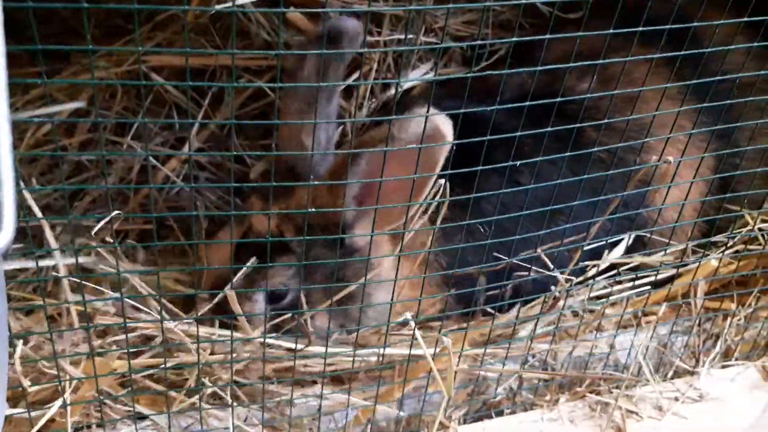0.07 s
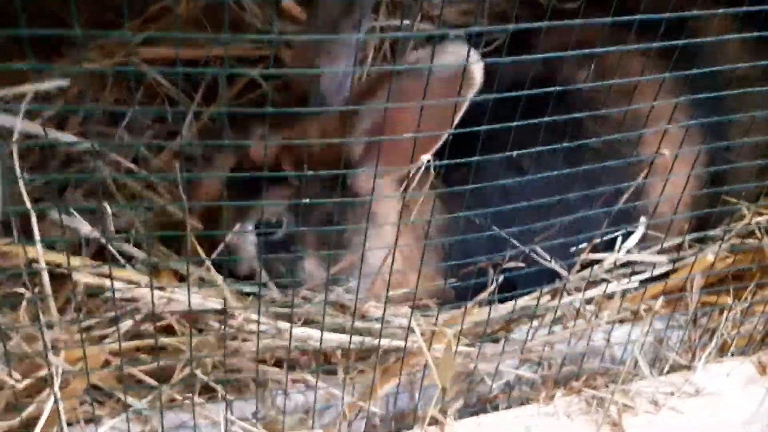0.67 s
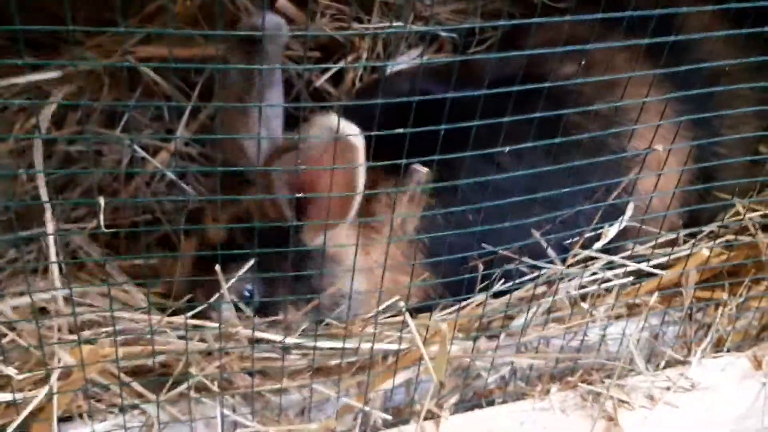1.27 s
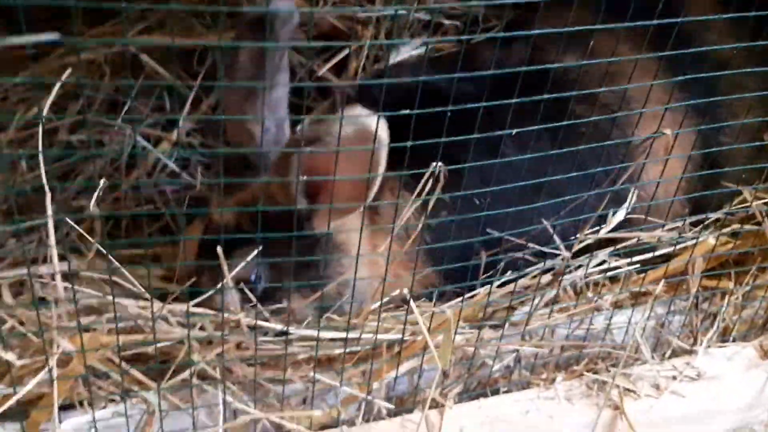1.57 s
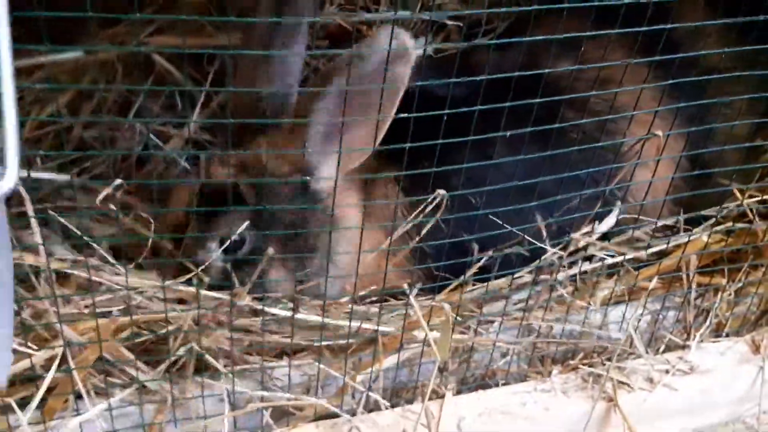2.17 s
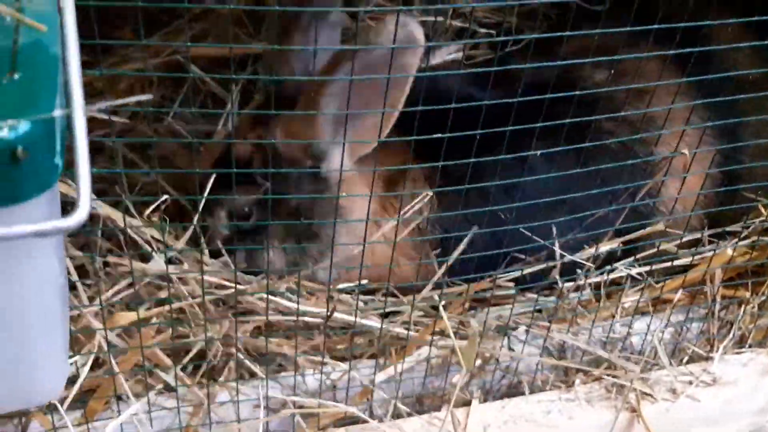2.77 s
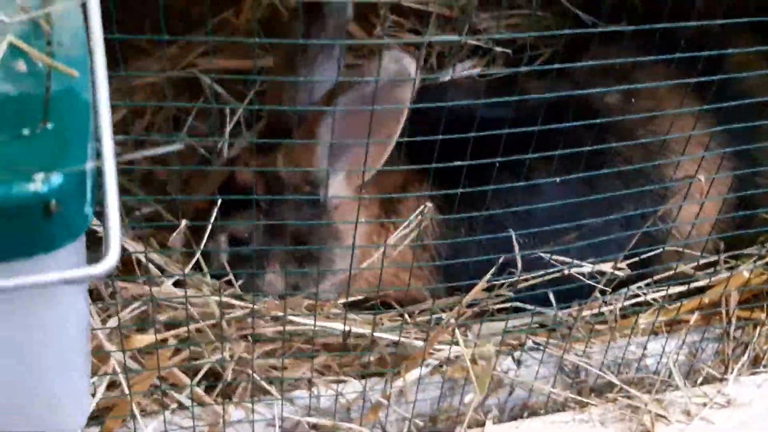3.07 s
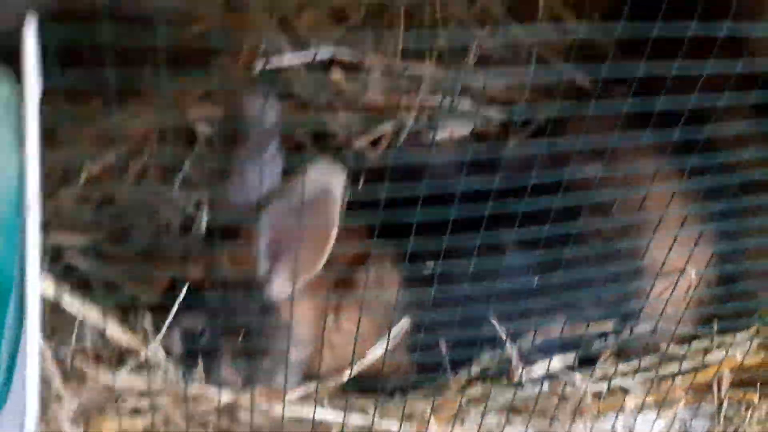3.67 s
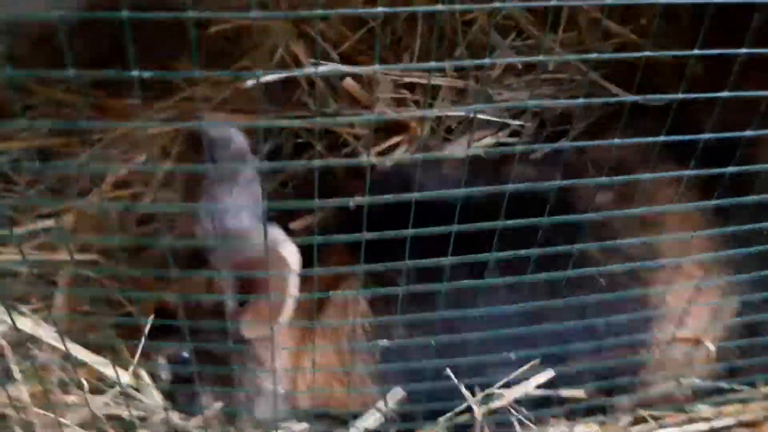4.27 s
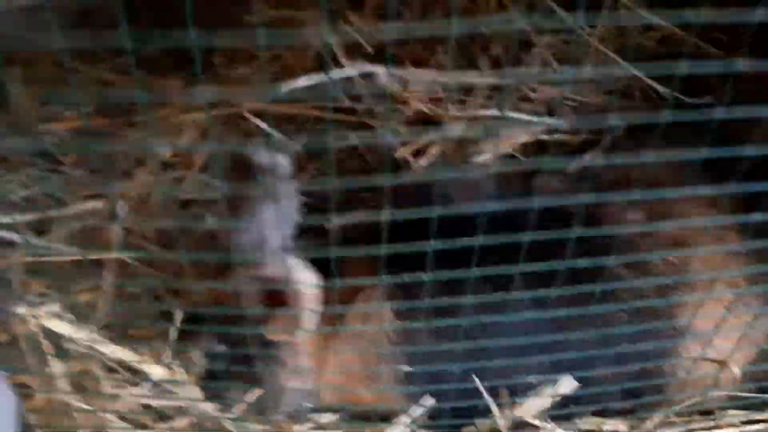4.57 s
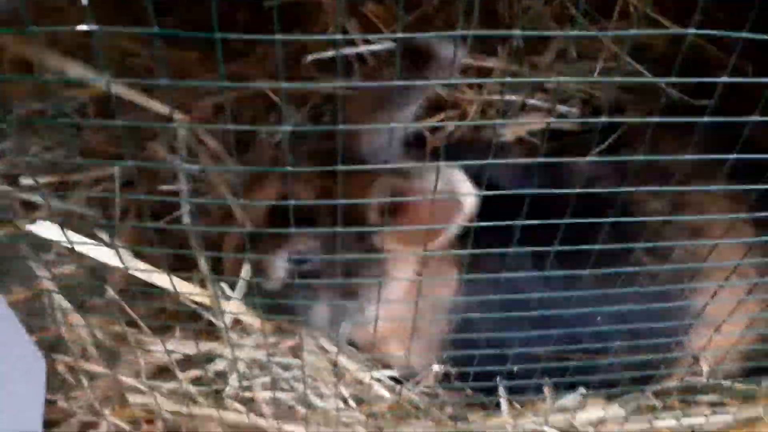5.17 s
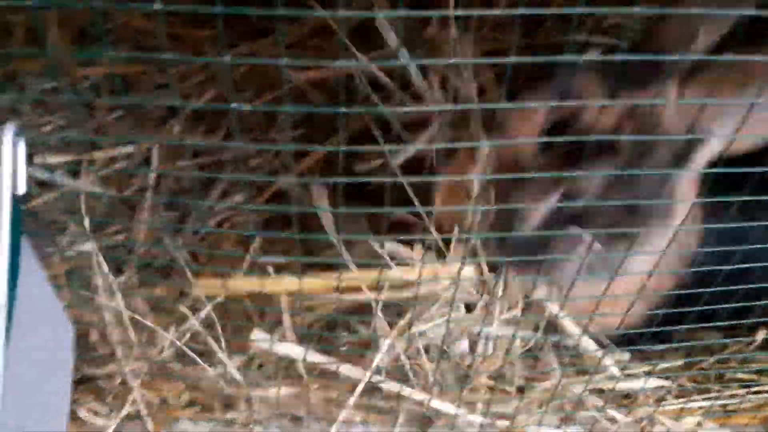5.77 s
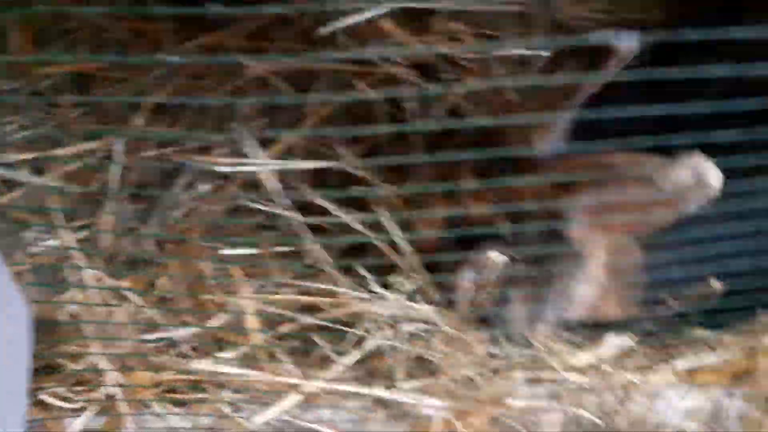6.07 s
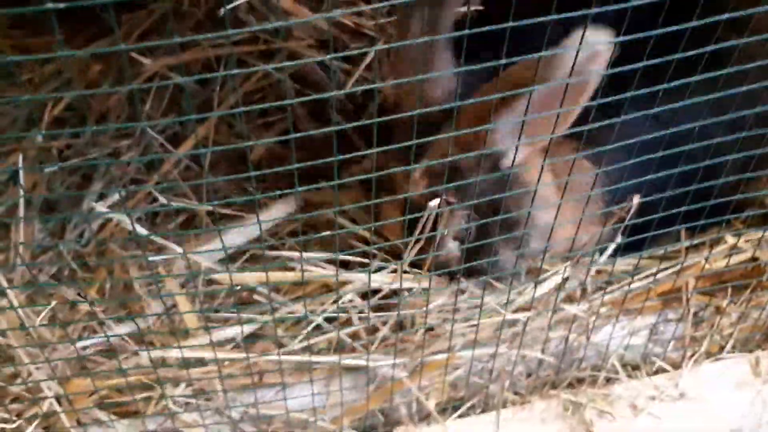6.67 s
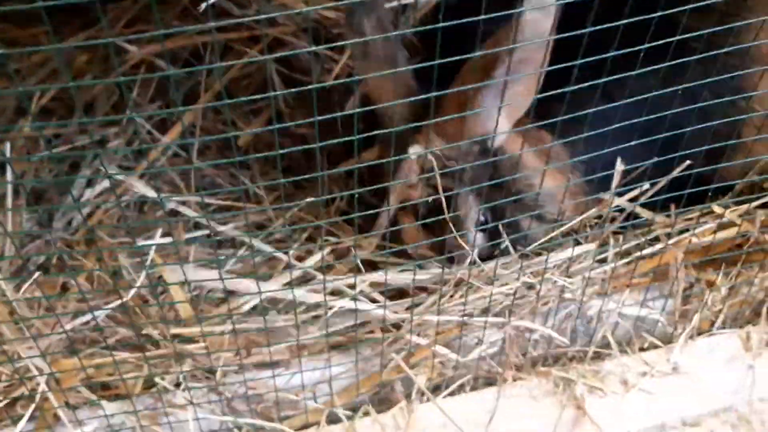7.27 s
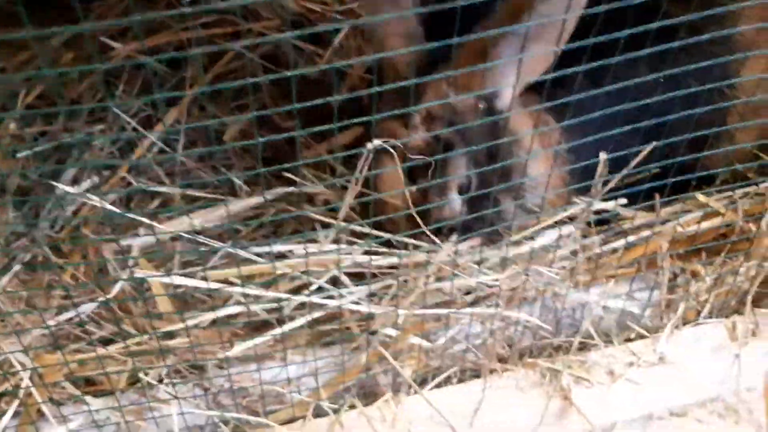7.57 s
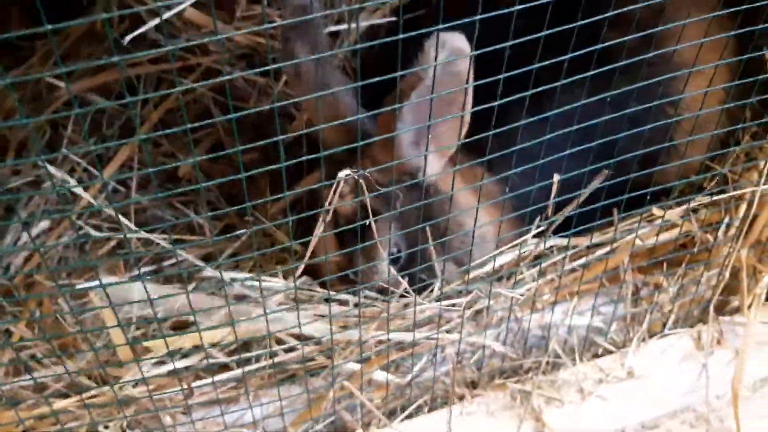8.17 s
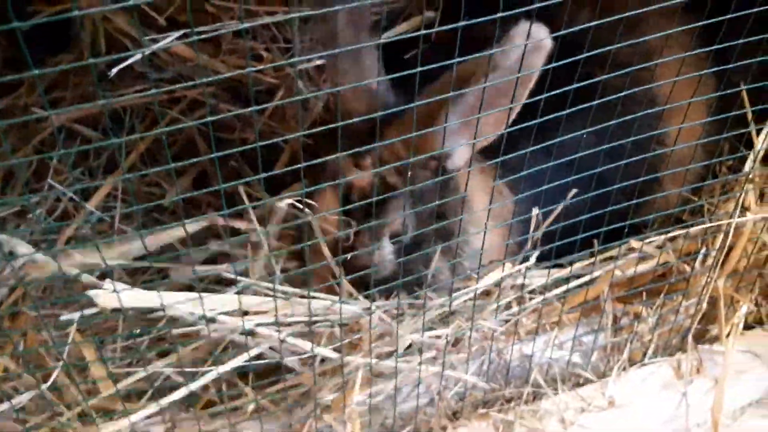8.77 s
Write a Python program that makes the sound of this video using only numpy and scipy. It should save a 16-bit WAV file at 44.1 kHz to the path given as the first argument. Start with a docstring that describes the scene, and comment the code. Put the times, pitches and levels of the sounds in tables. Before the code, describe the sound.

Close, crisp rustling of straw swells and relaxes as a rabbit pushes and tugs at its bedding in an outdoor hutch. Stalks snap here and there, and a rubbed board gives brief, faint hollow notes. Low wind buffets the microphone around the middle, then a claw or tooth knocks the wood several times. The brightest crackle comes at the end.

```python
"""Rabbit in a straw-filled hutch

A rabbit noses and tugs through dry straw, close to a stereo microphone. With each shove countless
stalks crackle, thicker stems crunch and the bedding scrapes over the floor boards; single stalks snap.
Now and then it rubs a hollow note from a board or knocks the wood with a claw or tooth.
Light puffs of air rumble in one microphone port or the other, over a quiet outdoor background."""
import sys
import numpy as np
from scipy import signal
from scipy.io import wavfile
from scipy.ndimage import uniform_filter1d

SR = 44100
rng = np.random.default_rng(int(sys.argv[2]) if len(sys.argv) > 2 else 0)


def pcm_store(signal):
    """Save signal as 16-bit PCM."""
    levels = np.round(np.clip(np.atleast_2d(signal), -1, 1) * 32767)
    wavfile.write(sys.argv[1], SR, levels.astype(np.int16).T)


N = 393813


def gain_of(db):
    """Decibels to gain."""
    return 10 ** (np.asarray(db) / 20)


def unit_rms(x):
    """Scales to rms 1."""
    return x / np.sqrt(np.mean(x ** 2) + 1e-20)


def pan(db):
    """Left and right gains for a level difference; positive leans left."""
    return gain_of(np.array([[db], [-db]]) / 2)


def fader(points):
    """A curve of (time_s, level_db) points as a gain for every sample."""
    times, db = np.transpose(points)
    return gain_of(np.interp(np.arange(N) / SR, times, db))


def add(mix, start_s, sound):
    """Mixes a stereo sound in at start_s."""
    part = mix[:, max(round(start_s * SR), 0):][:, :sound.shape[1]]
    part += sound[:, :part.shape[1]]


def colour(x, points, size=4096):
    """Minimum-phase EQ through (pitch_hz, gain_db) points."""
    hz, db = np.transpose(points)
    log_hz = np.log(abs(np.fft.fftfreq(size, 1 / SR)) + 1)
    log_gain = np.log(gain_of(np.interp(log_hz, np.log(hz), db)))
    response = np.exp(np.conj(signal.hilbert(log_gain)))
    taps = np.fft.ifft(response).real[:size // 2]
    return signal.oaconvolve(x, taps[None], axes=1)[:, :x.shape[1]]


def ring(x, hz, width_hz):
    """One resonance of gain 1."""
    return signal.lfilter(*signal.iirpeak(min(hz, SR * .45), hz / width_hz, fs=SR), x)


def wood_ring(x, modes):
    """A wooden part ringing in its modes."""
    return sum(gain_of(db) * ring(x, hz, width_hz) for hz, width_hz, db in modes)


def stereo_noise(size, alike):
    """White noise whose two channels have the correlation `alike`."""
    left, other = rng.standard_normal((2, size))
    return np.array([left, alike * left + np.sqrt(1 - alike ** 2) * other])


def hutch(x, wet_db, t60_s, size=8192):
    """Direct sound plus the dense, short echoes of the box, different at each microphone."""
    t = np.arange(size) / SR
    tail = rng.standard_normal((2, size)) * gain_of(-60 * t / t60_s) * (1 - np.exp(-t / 0.0014))
    tail *= gain_of(wet_db) / np.linalg.norm(tail[0])
    return x + signal.oaconvolve(x, tail, axes=1)[:, :x.shape[1]]


def burst(decay_s, alike, size=4096):
    """Stereo noise that starts at once and dies away."""
    return stereo_noise(size, alike) * np.exp(-np.arange(size) / SR / decay_s)


def grains(per_s, spread_db, decay_s, echo, t60_s, alike, lag_s, size=4096):
    """Fibres break at random, mostly small, a few large: noise bursts trailed by the box's echoes."""
    chance, strength = rng.random((2, N))
    sizes = gain_of(spread_db * np.minimum(-np.log(1 - strength), 5))
    energy = (chance < per_s / SR) * sizes ** 2
    t = np.arange(size) / SR
    energy_fades = np.exp(-t / decay_s) ** 2, gain_of(-60 * t / t60_s) ** 2
    hits, tails = (np.sqrt(abs(signal.oaconvolve(energy, fade / fade.sum())[:N]))
                   for fade in energy_fades)
    left, right = stereo_noise(N, alike) * hits
    direct = np.array([left, np.roll(right, int(lag_s * SR))])  # the left microphone is nearer
    return direct + echo * tails * rng.standard_normal((2, N))


def drift(x, depth_db, span_hz, span_s):
    """Different stalks come into play, so the colour drifts in patches."""
    spectrum = signal.stft(x, nperseg=512)[2]
    patches = rng.standard_normal(spectrum.shape[1:])
    for axis, steps in enumerate((span_hz * 512 / SR, span_s * SR / 256)):
        for _ in range(2):
            patches = uniform_filter1d(patches, max(int(steps), 1), axis)
    return signal.istft(spectrum * gain_of(depth_db * unit_rms(patches)), nperseg=512)[1][:, :N]


def pushing():
    """Each shove swells and relaxes; returns the envelopes that drive crackle, crunch and boards."""
    # shoves and tugs: peak_s, rise_s, fall_s, crackle_db, crunch_db, boards_db (last two re crackle)
    shoves = [(.13, 0.18, 0.24, -48.5, -9, -17), (.26, 0.072, 0.049, -50, -9.5, -14),
              (.52, 0.092, .07, -45, -10, -19), (.595, 0.067, 0.079, -46.5, -6, -17),
              (0.9, 0.051, 0.076, -48, -7.5, -14), (1.178, 0.063, .022, -50.5, -11.5, -31),
              (1.226, 0.018, .02, -48, -5, -17), (1.289, 0.044, .079, -51, -7, -15.5),
              (1.435, 0.064, 0.07, -57, -4, -9), (1.644, 0.084, 0.07, -56, -5, -7.5),
              (1.789, 0.19, 0.017, -51, -14.5, -15), (1.948, .12, 0.045, -48, -7, -14),
              (2.239, 0.12, 0.035, -51, -7.5, -15), (2.309, 0.023, .1, -48, -6, -10.5),
              (2.443, 0.16, 0.022, -55, -8.5, -10.5), (2.656, .096, 0.053, -48, -7.5, -11.5),
              (2.734, .075, 0.17, -50, -9.5, -13.5), (2.899, .014, 0.092, -51, -4, -10),
              (3.203, .11, 0.04, -43.5, -9.5, -21), (3.358, 0.12, .038, -50.5, -8, -10),
              (3.418, 0.024, .09, -54.5, -1.5, -1.5), (3.69, 0.12, 0.11, -56, 0, -2.5),
              (3.82, 0.058, 0.043, -46, -7.5, -16.5), (3.93, 0.088, 0.2, -50, -7, -16.5),
              (4.207, 0.024, 0.11, -48.5, -13.5, -32), (4.376, 0.29, .067, -55.5, -3, -12.5),
              (4.513, .088, 0.36, -53.5, -4, -8.5), (4.775, 0.067, 0.091, -40, -7, -13.5),
              (4.835, 0.053, 0.043, -47, -5.5, -6), (4.98, 0.12, 0.1, -62, -7, -5.5),
              (5.3, .059, .11, -40.5, -9, -16.5), (5.397, 0.034, .221, -43.5, -6, -10),
              (5.609, 0.039, 0.064, -49, -2.5, -5.5), (5.806, 0.11, 0.15, -41, -9.5, -11.5),
              (5.914, .063, 0.038, -47, -0.5, -10), (5.99, 0.041, 0.085, -39, -7.5, -10),
              (6.446, .15, .101, -50.5, -11, -20), (6.637, .14, 0.079, -43, -8, -18.5),
              (6.729, 0.051, 0.091, -46.5, -9, -12.5), (7, 0.12, 0.086, -44, -10.5, -16),
              (7.075, .03, 0.048, -50.5, -6, -7), (7.275, 0.064, 0.07, -49, -7, -11.5),
              (7.462, 0.095, 0.018, -48.5, -6.5, -13), (7.496, 0.032, 0.053, -49, 0.5, 2.5),
              (7.742, 0.11, .15, -53.5, -9.5, -21), (7.843, .075, 0.062, -51, -17, -14),
              (8.226, 0.18, 0.04, -51.5, -10, -19), (8.284, .019, 0.037, -43, -6.5, -16),
              (8.442, 0.057, .1, -47, -6.5, -13), (8.66, 0.081, 0.15, -48, -10, -16.5),
              (8.911, 0.059, .069, -34.5, -8.5, -20.5)]
    swell_shape = 1.3  # 1 pointed, 2 rounded
    settling_db = -71.5 + np.array([[0], [-9.5], [-19]])  # the straw never lies quite still
    t = np.arange(0, N / SR, .002)
    power = gain_of(settling_db) ** 2
    for peak_s, rise_s, fall_s, db, crunch_db, boards_db in shoves:
        swell = np.exp(-abs((t - peak_s) / np.where(t < peak_s, rise_s, fall_s)) ** swell_shape)
        gains = gain_of(db + np.array([[0], [crunch_db], [boards_db]]))
        power = power + (gains * swell) ** 2
    return [np.interp(np.arange(N) / SR, t, np.sqrt(layer)) for layer in power]


def crackle(drive):
    """Thin dry stalks slip over each other in a bright spray of ticks."""
    # crisp top end of dry straw: pitch_hz, gain_db
    straw_eq = [(1800, -33), (3300, -8.5), (5000, 0), (6300, 1.7), (7800, 4), (8600, -3.5), (9500, -2),
                (11800, 4.5), (13500, 3.5), (15800, 2.5)]
    ticks = grains(per_s=2200, spread_db=3.4, decay_s=.0005, echo=.8, t60_s=.07, alike=.4, lag_s=.00005)
    ticks = drift(ticks, depth_db=1, span_hz=1186, span_s=.025)
    return gain_of(2.4) * pan(-0.12) * drive * unit_rms(colour(ticks, straw_eq))


def crunch(drive):
    """Thicker stems bend deeper in the bedding; the brittle ones splinter and sound brighter."""
    # midrange of bending stems: pitch_hz, gain_db
    bend_eq = [(450, -19), (750, -4.5), (920, -1), (1150, -2.5), (1400, -1.5), (1800, 0), (2250, 0.5),
               (2800, -7), (3600, -14), (6000, -21)]
    # bite of splitting stems: pitch_hz, gain_db
    splinter_eq = [(1200, -24.5), (2200, -7), (2900, -3), (4000, -4), (5500, -10), (9000, -14.5)]
    # how much the pressed stems splinter: time_s, gain_db
    brittleness = [(0, 2.5), (1.6, 0.5), (3.2, 0), (3.9, -2), (6, -1.5), (6.3, -6), (7.15, -4.5), (8, -20),
                   (8.3, -0.5), (8.93, -1.5)]
    bends = grains(per_s=1500, spread_db=2.5, decay_s=.0011, echo=.96, t60_s=.079,
                   alike=.52, lag_s=.00039)
    bends = drift(bends, depth_db=2.5, span_hz=350, span_s=.05)
    splinters = grains(per_s=700, spread_db=3.5, decay_s=.00039, echo=1, t60_s=.13,
                       alike=.34, lag_s=.00007)
    splinters = drift(splinters, depth_db=1, span_hz=700, span_s=.028)
    bending = gain_of(-1.26) * pan(4.7) * unit_rms(colour(bends, bend_eq))
    splitting = gain_of(-1) * pan(0.74) * fader(brittleness) * unit_rms(colour(splinters, splinter_eq))
    return drive * (bending + splitting)


def boards(drive):
    """The dragged bedding sets the floor boards ringing."""
    # modes of the floor boards: pitch_hz, width_hz, gain_db
    floor_modes = [(293, 46, -4.5), (347, 55, 0), (419, 25, 3), (486, 54, 4), (583, 64, -3), (750, 81, -23)]
    scrape = grains(per_s=1200, spread_db=1, decay_s=.00072, echo=.55, t60_s=.17,
                    alike=.85, lag_s=.00008)
    wood = wood_ring(scrape, floor_modes)
    wood = colour(wood, [(100, -25.5), (260, -2.5), (750, -4), (1500, 0), (4000, -45)])
    return gain_of(-0.07) * pan(0.29) * drive * unit_rms(wood)


def outdoor_air():
    """A quiet, steady bed of outdoor noise."""
    # low murmur with a faint hiss: pitch_hz, gain_db
    air_eq = [(20, -29), (70, 5), (150, -0.5), (300, -6), (550, -9), (900, -16.5), (1900, -16), (3300, -34),
              (7000, -12), (9000, -20), (15000, -17)]
    return gain_of(-66) * unit_rms(colour(stereo_noise(N, alike=0.75), air_eq))


def ports(pan_db):
    """Constant-power gains for air striking one port more than the other; positive leans left."""
    return 1 / np.sqrt(1 + gain_of(2 * np.array([[-pan_db], [pan_db]])))


def buffeting():
    """Turbulence rumbles in each port separately, swelling with every puff; single eddies thump softly."""
    # deep wind rumble: pitch_hz, gain_db
    rumble_eq = [(20, -49), (35, -26), (50, -2), (80, -0.5), (110, -7.5), (160, -13.5), (250, -21),
                 (400, -35), (900, -54)]
    # puffs passing the ports: peak_s, half_length_s, level_db, pan_db
    puffs = [(0.405, .025, -57, 7), (0.889, 0.041, -52, -24), (1.18, 0.065, -53, -27),
             (1.503, 0.14, -56, -13), (1.76, 0.16, -56, -16), (1.964, 0.049, -60, 2),
             (2.41, 0.13, -59.5, -12), (2.764, 0.074, -56.5, -3), (3.106, 0.093, -46, -12),
             (3.645, 0.067, -43, -32), (3.823, 0.084, -47.5, -16), (3.941, 0.063, -35.5, -25),
             (4.07, 0.093, -46.5, -7), (4.277, 0.072, -44, -3), (4.51, 0.15, -49.5, -3),
             (4.69, 0.1, -44, 2.5), (4.86, 0.043, -51.5, -20), (5.034, 0.089, -56, -5),
             (5.17, 0.0083, -51, -25), (5.376, 0.048, -55, -12), (5.576, 0.055, -56.5, -5),
             (5.86, 0.13, -62, 2), (6.287, 0.046, -52.5, -28), (7.524, 0.057, -59, 2), (7.78, .06, -68, 0),
             (8.302, .03, -65, 7), (8.92, .07, -57.5, 3)]
    # faint draught between puffs, dying down late on: time_s, level_db
    draught = [(0, -67), (.75, -68), (2.1, -72), (3.3, -62), (5.3, -62.5), (6.4, -83), (8.93, -78)]
    # eddies hitting a port: peak_s, level_db, pitch_hz, half_length_s, pan_db
    eddies = [(1.191, -39, 68.5, 0.01, -26), (1.463, -40, 85.5, 0.0068, -22), (1.533, -40, 80, 0.0088, -15),
              (3.094, -28, 85, 0.0087, -30), (3.601, -34, 85, 0.013, -27), (3.662, -32, 80, 0.0071, -34),
              (3.701, -33.5, 101, 0.0081, -28), (3.911, -28.5, 75, 0.0091, -29),
              (3.948, -32.5, 86, 0.013, -30), (3.969, -26, 85, .01, -28), (4.259, -28, 74, 0.011, 10),
              (4.48, -37, 70, 0.015, -17), (4.562, -23, 86, 0.0047, 24), (4.725, -27.5, 73.5, 0.013, 20),
              (6.277, -47, 109, 0.028, -26)]
    rumble = unit_rms(colour(rng.standard_normal((2, N)), rumble_eq, size=16384))
    t = np.arange(0, N / SR, .002)
    power = sum((gain_of(db) * ports(pan_db) * np.exp(-((t - peak_s) / half_s) ** 2)) ** 2
                for peak_s, half_s, db, pan_db in puffs)
    swells = np.array([np.interp(np.arange(N) / SR, t, np.sqrt(side)) for side in power])
    out = gain_of(2.7) * np.hypot(swells, ports(pan_db=-7) * fader(draught)) * rumble
    for peak_s, db, hz, half_s, pan_db in eddies:
        t = np.arange(-3 * half_s, 3 * half_s, 1 / SR)
        phase = rng.normal(0, 0.59, (2, 1))
        thump = np.exp(-(t / half_s) ** 2) * np.cos(2 * np.pi * hz * t + phase)
        add(out, peak_s + t[0], gain_of(db) * ports(pan_db) * thump)
    return out


def snaps():
    """A stalk breaks in under a millisecond, its last fibres tear, it rings and the hutch answers."""
    # single stalks breaking: start_s, level_db, pitch_hz, pan_db
    breaks = [(0.269, -35, 7900, -11), (0.961, -43.5, 15000, 5), (1.1763, -38, 14600, 3),
              (1.2189, -39, 14600, -2), (1.235, -43, 14400, -5), (1.3835, -40, 14900, 1),
              (1.4207, -41.5, 6700, 4), (1.787, -44, 14400, -6), (1.8814, -40, 13400, -1),
              (2.177, -38.5, 6300, 2), (2.2854, -40.5, 4500, 1), (2.2973, -36, 14400, 4),
              (2.598, -40, 11800, 4), (2.6663, -47, 14600, -1), (2.8955, -40, 6200, -5),
              (3.7997, -41.5, 12000, 6), (4.3762, -45, 7300, -2), (4.8445, -34.5, 14600, -1),
              (5.249, -40, 7500, 3), (5.6044, -38, 13300, 2), (5.6645, -40, 8150, 4),
              (5.6973, -39, 14600, -2), (5.897, -38.5, 7800, 6), (5.973, -48, 14600, 0),
              (5.996, -38, 7500, 1), (6.064, -36.5, 13100, -2), (6.4308, -39.5, 13300, -3),
              (6.5754, -47, 5500, -2), (6.708, -44, 6400, 8), (7.2364, -41, 5600, 3),
              (7.777, -35.5, 15100, -3), (7.9155, -47.5, 13500, -3), (8.2164, -40.5, 13900, 1),
              (8.346, -36.5, 13300, 0), (8.4097, -40, 12500, -4), (8.4542, -31.5, 14400, 1),
              (8.7307, -45, 14300, 4), (8.7416, -31, 14700, -1), (8.7857, -40.5, 7600, 5),
              (8.8554, -26.5, 14700, 3), (8.9222, -28, 13800, 6)]
    # sharp tone of a breaking stalk: pitch_hz, gain_db
    snap_eq = [(300, -12), (2000, -19), (3500, -9.5), (5000, -2.5), (7700, 0), (8800, -8.5), (11500, -1.5),
               (15800, -3.5)]
    out = np.zeros((2, N))
    for start_s, db, hz, pan_db in breaks:
        split = burst(decay_s=0.00043, alike=0.55)
        tear = gain_of(-11) * burst(decay_s=0.0015, alike=0.56)
        fracture = split + tear
        crack = colour(ring(fracture, hz, width_hz=3400) + gain_of(-8) * fracture, snap_eq)
        crack /= np.sqrt((crack ** 2).sum(1, keepdims=True) / (.0015 * SR))  # energy of 1.5 ms at rms 1
        add(out, start_s, hutch(gain_of(db) * pan(pan_db) * crack, wet_db=-1.5, t60_s=0.043))
    return out


def rubs(size=32768):
    """The rabbit's weight drags on one board, which swells and fades on a single hollow note."""
    # drones of a rubbed board: peak_s, level_db, half_length_s, pitch_hz, width_hz
    drones = [(1.181, -62, 0.036, 265, 48), (1.598, -54, .024, 296, 84), (1.612, -59.5, .039, 463, 108),
              (1.631, -58.5, .094, 171, 72), (1.787, -73, 0.097, 560, 60), (2.65, -59, 0.024, 510, 130),
              (4.25, -48.5, 0.029, 269, 59), (4.785, -47, 0.028, 462, 129), (7.293, -56, 0.046, 370, 84),
              (7.523, -47, 0.046, 394, 108), (7.54, -54, 0.077, 128, 60), (7.603, -61.5, 0.069, 273, 108),
              (7.81, -53, 0.032, 140, 60), (8.043, -70, 0.19, 596, 84)]
    out = np.zeros((2, N))
    t = (np.arange(size) - size / 2) / SR
    for peak_s, db, half_s, hz, width_hz in drones:
        drag = stereo_noise(size, alike=0.64)
        note = unit_rms(ring(ring(drag, hz, width_hz), hz, width_hz))
        add(out, peak_s + t[0], gain_of(db) * note * np.exp(-(t / half_s) ** 2))
    return out


def knocks():
    """A claw or tooth skips over a wall board: a short scuff rings its modes and the box booms."""
    # blows on the wood: start_s, level_db, scuff_decay_s, boom_db
    blows = [(1.2335, -48, .0064, -2), (1.382, -46, .008, -10), (1.42, -45, .008, -12),
             (2.1744, -42.5, .0071, 0), (2.895, -41, 0.011, -7), (5.402, -31.5, .0082, -23),
             (5.4142, -28, 0.014, -8), (5.4915, -29.5, 0.01, -9), (7.7266, -26.5, 0.01, 0.5),
             (7.7368, -27, 0.0059, 4), (8.2843, -36, 0.012, 2)]
    # modes of the wall boards: pitch_hz, width_hz, gain_db
    wall_modes = [(366, 24, -8.5), (480, 25, -9), (606, 84, -3), (930, 115, 0), (1360, 48, 3),
                  (1780, 160, 3.5), (2110, 270, 4.5), (2460, 830, -13), (3350, 1700, -3)]
    out = np.zeros((2, N))
    for start_s, db, decay_s, boom_db in blows:
        scuff = burst(decay_s, alike=0.37, size=16384)
        wood = wood_ring(scuff, wall_modes) + gain_of(-8) * scuff
        echoes = hutch(wood, wet_db=boom_db, t60_s=0.33) - wood
        # the box's tail favours the low notes
        boom = colour(echoes, [(100, -10), (400, 9.5), (900, 4.5), (2100, -7), (3200, -9.5), (9000, -27)])
        knock = colour(wood + boom,
                       [(100, 1), (300, -2.5), (2900, 2), (4200, -4.5), (7000, -1.5), (15000, -20)])
        add(out, start_s, gain_of(db) * pan(1.6) * knock / abs(knock).max())
    return out


def scene():
    """Straw, wood, breeze and background together."""
    stalks, bedding, floor = pushing()
    rustle = crackle(stalks) + crunch(bedding) + boards(floor)
    return rustle + rubs() + snaps() + knocks() + buffeting() + outdoor_air()


def record(dry):
    """Each microphone port colours the sound a little differently; the highest treble is cut off."""
    # how much louder the left port hears than the right: pitch_hz, lean_db
    port_lean = [(200, -2), (1000, -1.5), (1400, 0), (1750, 4), (2400, 1), (3400, -1), (5200, -0.5),
                 (7000, 3), (8600, -1), (11500, 1), (13300, -4), (15500, 4.5)]
    left = colour(dry[:1], [(hz, db / 2) for hz, db in port_lean])
    right = colour(dry[1:], [(hz, -db / 2) for hz, db in port_lean])
    high_cut = signal.firwin(511, cutoff=15850, window=("kaiser", 9), fs=SR)
    return signal.oaconvolve(np.vstack([left, right]), high_cut[None], "same")


dry = scene()
out = record(dry)
pcm_store(out)
```